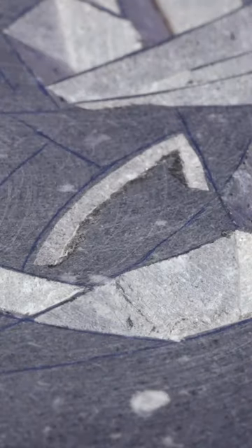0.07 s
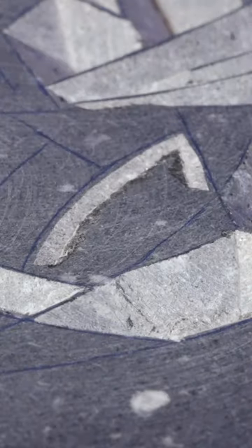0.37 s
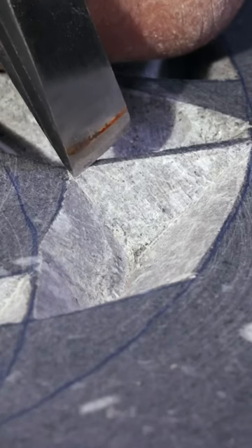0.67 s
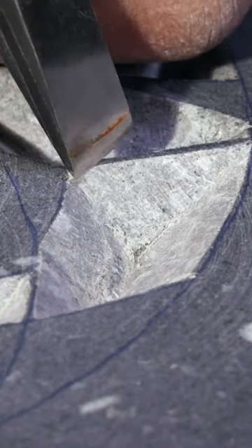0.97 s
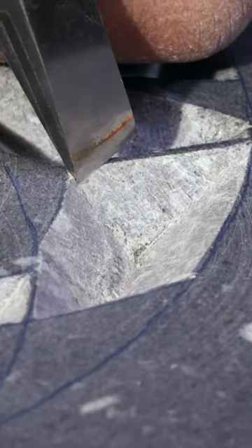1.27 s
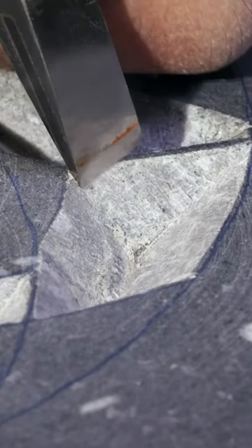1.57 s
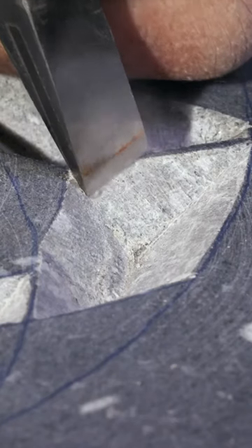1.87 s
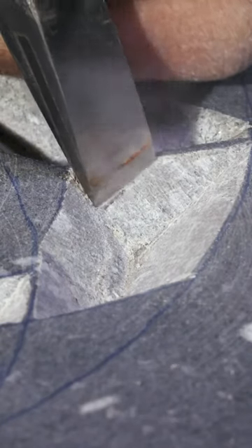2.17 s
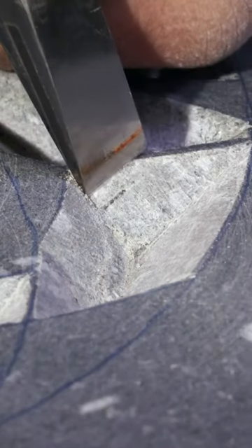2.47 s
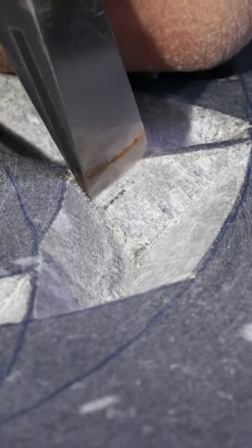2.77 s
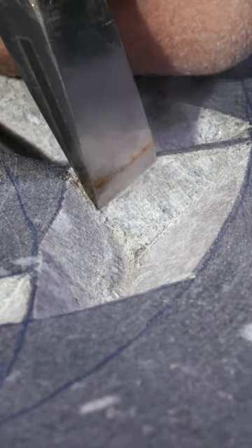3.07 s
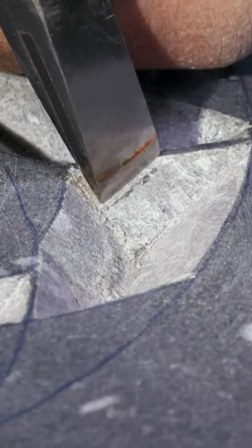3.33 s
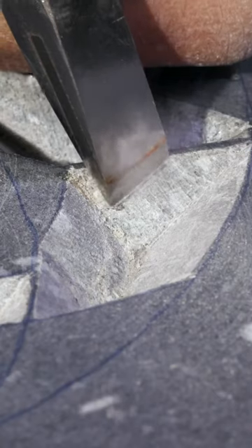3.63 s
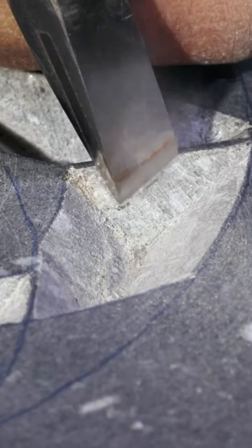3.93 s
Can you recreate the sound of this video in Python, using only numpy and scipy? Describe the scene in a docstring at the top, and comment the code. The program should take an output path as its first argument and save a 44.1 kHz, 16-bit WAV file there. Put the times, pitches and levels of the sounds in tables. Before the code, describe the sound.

An air-powered chisel carves stone close by, with little echo. After two faint thumps, air hisses and the tool stutters from 0.5 seconds, then hammers rapidly from 0.9, its steel ringing brightly over a low buzz from the block. At 2.3 seconds it pauses, the hiss drops and the edge ticks lightly twice. A second, uneven burst with hissing air runs from 2.7 seconds to the end at 4.

```python
"""An air-powered chisel carves stone close by, in a workshop with little echo. After two soft thumps, air
hisses out and the tool stutters, then hammers steadily from 0.9 s. Each piston stroke rings the steel, thumps
the stone and knocks back in the barrel; exhaust pulses make the barrel and hose buzz at the stroke rate, and
the ring shifts as the edge works deeper. At 2.3 s the tool pauses and the air dies down. Two light ticks
follow, then a second, uneven burst runs from 2.7 s to the end."""
import sys
import numpy as np
from scipy import signal
from scipy.fft import rfft, irfft, next_fast_len
from scipy.io import wavfile

SR = 44100
rng = np.random.default_rng(int(sys.argv[2]) if len(sys.argv) > 2 else 0)


def generate_wav(signal):
    """Clip the signal to [-1, 1] and save it as 16-bit WAV at the path in sys.argv[1]."""
    frames = np.transpose(np.atleast_2d(signal))
    scaled = np.clip(frames, -1, 1) * 32767
    pcm = np.round(scaled).astype(np.int16)
    wavfile.write(sys.argv[1], SR, pcm)


N = 176400
HIT_SIZE = 2048  # samples in one hit
TIME = np.arange(N) / SR
HIT_TIME, HIT_HZ = np.arange(HIT_SIZE) / SR, np.fft.rfftfreq(HIT_SIZE, 1 / SR)

# The tone of each sound. Each row: frequency in Hz, relative level in dB.
BACKGROUND_TONE = [(30, -41), (191, -5), (345, -18), (495, 1), (3070, -7), (14000, -21)]
HISS_TONE = [(500, -29), (1250, -19), (1800, -0.5), (2400, -1), (3300, 3.5), (5500, 2.5), (7400, 5),
             (8200, 2.5), (9500, 5), (11000, -1), (12000, 2.5), (14600, 4)]
RUSH_TONE = [(25, -19), (65, -21), (165, -1), (300, 7.5), (560, -1), (720, 4.5), (1100, -13), (3000, -47)]
THUMP_TONE = [(30, -30), (100, 5.5), (250, 5), (350, -4), (500, -34), (2000, -60)]
BUZZ_TONE = [(100, -34), (165, -2), (210, -12.5), (260, 4), (325, 2), (440, -11.5), (550, -12), (670, -6),
             (950, -13.5)]
THUD_TONE = [(30, -30.5), (110, -22.5), (170, -5.5), (280, -1), (430, 1), (560, -2), (720, 2.5),
             (1000, -24.5), (1600, -29), (5000, -44)]
KNOCK_TONE = [(200, -35), (1200, -18), (1800, -2), (2400, -5), (3100, 1), (4200, 3.5), (5400, -3),
              (7400, -0.5), (8200, -9.5), (10000, -12), (15000, -14)]
RATTLE_TONE = [(70, 16), (700, -52)]
CRACK_TONE = [(200, -25), (900, -7), (1300, -13), (1800, -6.5), (3500, -0.5), (7000, 1), (11000, -5),
              (15000, 2.5)]
# What happens on the way to the listener. Each row: frequency in Hz, gain in dB.
WALL_TONE = [(1000, -24.5), (3000, -14), (7000, -12.5), (12000, -18)]  # the nearest reflection
ECHO_TONE = [(150, -8), (600, -4.5), (3000, -8.5), (15000, -15.5)]  # the room's tail
STEREO_WIDTH = [(60, 2), (150, -6), (600, -10), (1200, -3.5), (3000, -9), (7000, -18), (14000, -13)]  # the part that differs between left and right
LEFT_OVER_RIGHT = [(750, .5), (1200, -5), (3000, -3), (8000, 0)]
MIC_TONE = [(14950, 0), (15450, -8), (15900, -24), (16500, -42)]
# How long the room rings. Each row: frequency in Hz, seconds to fade by 60 dB.
ECHO_FADE = [(150, 0.13), (600, 0.25), (3000, 0.25), (8000, 0.18), (15000, 0.11)]
# Air leaving the tool. Each row: time in seconds, hiss level in dB, low rush level in dB.
AIR_LEVELS = [(0, -36, -53.5), (.1, -53.5, -68), (.16, -74, -79), (.25, -85, -80), (.472, -86, -90),
              (.488, -40.5, -59), (.51, -48, -43), (.63, -38, -50), (.78, -39.5, -47), (.88, -31, -38),
              (.95, -36, -53), (1.3, -32.5, -49), (2.05, -31, -47), (2.2, -34, -55), (2.3, -39, -64),
              (2.35, -59, -57), (2.43, -58.5, -67), (2.57, -62.5, -71), (2.65, -54.5, -64),
              (2.69, -28, -39.5), (2.8, -31, -46.5), (3.15, -30.5, -45.5), (3.34, -36.5, -49),
              (3.44, -31.5, -42.5), (3.6, -32, -51), (3.81, -34, -57), (4, -31.5, -55)]
# Single hits. Each row: start in seconds, relative level in dB.
SOFT_THUMPS = [(0.235, -53.5), (0.291, -41)]  # handling the tool
EDGE_TICKS = [(2.476, -48), (2.616, -38.5)]  # setting the edge
DULL_BUMPS = [(.504, -28), (.677, -28), (.726, -25), (.794, -22.5), (.872, -23), (2.163, -30.5),
              (2.212, -32.5), (2.251, -30), (2.301, -29.5), (2.657, -43.5), (3.23, -29.5), (3.269, -27),
              (3.31, -24.5), (3.355, -23.5), (3.409, -26), (3.796, -30)]  # the tool bumps the stone
LONE_KNOCKS = [(.504, -10), (0.5077, -20), (0.5301, -19), (0.556, -19), (0.592, -22), (0.6515, -21),
               (0.714, -19), (0.847, -16), (0.8724, -9.5), (0.901, -15), (1.3245, -16), (1.9953, -16),
               (2.193, -20.5), (2.2343, -15.5), (2.2897, -16), (2.717, -16), (2.7418, -20), (2.8851, -19.5),
               (3.3373, -17.5), (3.377, -15), (3.4325, -15)]  # piston and shank (the chisel's shaft) knock
LONE_BLOWS = [(0.5149, -8.5), (0.5423, -15.5), (0.571, -16), (0.6169, -17.5), (0.676, -22.5), (.8725, -32)]  # the piston stutters
# The piston's pace. Each row: time in seconds, strokes per second.
FIRST_BURST = [(0.916, 34.33), (1.102, 33.82), (1.157, 31.71), (1.295, 32.05), (1.526, 35.54),
               (1.62, 41.28), (1.681, 30.82), (1.828, 42.31), (1.998, 40.81), (2.078, 50.12),
               (2.132, 35.24), (2.255, 20.93)]
SECOND_BURST = [(2.729, 41.78), (3.117, 41.76), (3.22, 26.66), (3.356, 21.3), (3.387, 31.71),
                (3.453, 48.03), (3.554, 36.67), (3.685, 44.36), (3.744, 32.9), (3.836, 31.33),
                (3.873, 37.5), (3.924, 45.12), (3.999, 43.49)]
# Strength through the bursts. Each row: time in seconds, relative level in dB.
TOOL_PRESS = [(.916, -45.5), (1.06, -50.5), (1.2, -44), (1.58, -44.5), (1.686, -50), (1.78, -42),
              (1.85, -47.5), (2.09, -43), (2.138, -59), (2.255, -52.5), (2.729, -45), (3.13, -45.5),
              (3.2, -65), (3.42, -49), (3.53, -52), (3.63, -46), (3.75, -52.5), (3.82, -46), (4, -47.5)]  # how hard the tool's body presses on the stone; sets the buzz and the thuds
EDGE_FORCE = [(.915, -9.5), (1.12, -11.5), (1.152, -18), (1.184, -8.5), (1.57, -8), (1.676, -13),
              (1.79, -8), (1.86, -12.5), (2.09, -12.5), (2.211, -16), (2.254, -25), (2.728, -4.5),
              (2.76, -9), (2.85, -11.5), (3.16, -12), (3.229, -14.5), (3.269, -13.5), (3.356, -16.5),
              (3.392, -16.5), (3.42, -5.5), (3.49, -12.5), (3.588, -15), (3.613, -24), (3.637, -11),
              (3.684, -11.5), (3.795, -15), (3.909, -8.5), (4, -15.5)]  # how hard the edge is driven in
# Notes of the block and its bench. Each row: pitch in Hz, relative level in dB, seconds to fade by 60 dB.
BLOCK_NOTES = [(162.5, -3.5, 0.42), (289.1, 3, 0.23), (446, 2.5, 0.59), (661, 2.5, 0.14)]
# Progress of the cut. Each row: time in seconds, depth from 0 (shallow) to 1 (deep).
CUT_DEPTH = [(.9, 0.03), (1.4, 0), (2, 0.82), (2.8, 0.75), (3.6, 1)]
# Notes of the steel. Each row: shallow and deep pitch in Hz, width in Hz, shallow and deep gain in dB.
STEEL_NOTES = [(5560, 5600, 140, -6, 1.5), (5600, 6570, 240, -23, -4), (7050, 6200, 220, -19, -7.5),
               (7100, 7000, 135, -14, 1.5), (8320, 7000, 360, -3, 6), (8800, 8690, 260, -33, 2.5),
               (10000, 9740, 490, 5, 0), (12570, 11400, 860, 4.5, 2.5), (12200, 12330, 1550, -5, 1.5),
               (14100, 6700, 130, -2, 1), (14900, 14500, 395, 11, 3.5)]


def amp(db):
    """Turn decibels into a gain."""
    return 10 ** (np.asarray(db) / 20)


def at_hz(table, hz):
    """Read a table between its frequencies, on a log scale."""
    freqs, values = np.transpose(table)
    return np.interp(np.log(hz + 1), np.log(freqs + 1), values)


def at_time(table, times):
    """Read each column of a table at the given times."""
    t, *columns = np.transpose(table)
    return [np.interp(times, t, column) for column in columns]


def filtered(x, response):
    """Scale each frequency of x by response(hz)."""
    size = next_fast_len(N + SR // 2)
    return irfft(rfft(x, size) * response(np.fft.rfftfreq(size, 1 / SR)), size)[..., :N]


def noise(tone):
    """Noise with the given tone and an average (rms) size of 1."""
    x = filtered(rng.standard_normal(N), lambda hz: amp(at_hz(tone, hz)))
    return x / x.std()


def hit_filter(tone):
    """Turn a tone into a filter that makes no sound before the hit (minimum phase)."""
    cepstrum = irfft(np.log(amp(at_hz(tone, HIT_HZ))))
    cepstrum[1:HIT_SIZE // 2] *= 2
    cepstrum[HIT_SIZE // 2 + 1:] = 0
    return np.exp(rfft(cepstrum))


def contacts(times, hold_s, decay_s, clean, rise_s=0.0007067, alike=0.45):
    """One spectrum per hit: a clean push plus a short crunch, partly like the one before."""
    grit = rng.standard_normal((len(times), HIT_SIZE))
    grit[1:] *= np.sqrt(1 - alike ** 2)
    grit = signal.lfilter([1], [1, -alike], grit, axis=0)
    rise = np.minimum(HIT_TIME / rise_s, 1) ** 2
    crunch = grit * rise * np.exp(-np.maximum(HIT_TIME - rise_s - hold_s, 0) / decay_s)
    push = clean * np.exp(-2j * np.pi * HIT_HZ * rise_s)
    return push + rfft(crunch / np.linalg.norm(crunch, axis=1, keepdims=True))


def play(times, level_db, spectra):
    """Lay hits out in time; a level is the hit's energy spread over a millisecond."""
    waves = irfft(spectra)
    gain = amp(level_db) * np.sqrt(SR / 1000) / np.linalg.norm(waves, axis=1)
    index = np.round(np.asarray(times) * SR).astype(int)[:, None] + np.arange(HIT_SIZE)
    return np.bincount(index.ravel(), (waves * gain[:, None]).ravel(), N)[:N]


def cycles(burst):
    """Time, stroke rate and strokes done so far through a burst."""
    t = np.arange(burst[0][0], burst[-1][0] + .002, 1 / SR)
    rate, = at_time(burst, t)
    return t, rate, np.cumsum(rate) / SR


def strokes(phase, lead_s=0.0006):
    """Times and stroke rates just before the piston passes a point (0 to 1) of its cycle."""
    rows = []
    for t, rate, done in map(cycles, (FIRST_BURST, SECOND_BURST)):
        i = np.searchsorted(done, np.arange(phase, done[-1]))
        rows.append([t[i] - lead_s, rate[i]])
    return np.hstack(rows)


def workshop(x, delay_s=0.0028):
    """The room answers with a near reflection and a short tail that dies fastest in the treble."""
    hz, t, spectra = signal.stft(rng.standard_normal(SR // 3), SR, nperseg=256)
    decay = amp(-60 * t / at_hz(ECHO_FADE, hz)[:, None])
    decay /= np.sqrt(np.sum(decay ** 2, axis=1, keepdims=True) * t[1] * SR)
    tail = signal.istft(spectra * decay * amp(at_hz(ECHO_TONE, hz))[:, None], SR, nperseg=256)[1]
    echo = signal.fftconvolve(x, tail)[:N]
    wall = filtered(x, lambda hz: amp(at_hz(WALL_TONE, hz)))
    return filtered(echo + wall, lambda hz: np.exp(-2j * np.pi * hz * delay_s))


def stereo_scatter(x, count=8, decay_s=0.0017):
    """Shifting reflections off the stone and the hand make left and right differ a little."""
    paths = rng.standard_normal((count, HIT_SIZE)) * np.exp(-HIT_TIME / decay_s)
    sway = [(15, 0), (60, -40), (300, -120)]  # Each row: frequency in Hz, level in dB.
    side = sum(noise(sway) * signal.fftconvolve(x, path)[:N] for path in paths) / np.linalg.norm(paths)
    side = filtered(side, lambda hz: amp(at_hz(STEREO_WIDTH, hz)))
    pair = np.array([x + side, x - side])
    return filtered(pair, lambda hz: amp(np.outer([.5, -.5], at_hz(LEFT_OVER_RIGHT, hz))))


def exhaust(open_db=-31, pivot_hz=3870):
    """Air hisses out, duller as the valve closes, over a low rush."""
    hiss_db, rush_db = at_time(AIR_LEVELS, TIME)
    hz, t, spectra = signal.stft(noise(HISS_TONE), SR, nperseg=256)
    db_per_octave = np.clip(0.63 * (at_time(AIR_LEVELS, t)[0] - open_db), -3, 0)
    octaves = np.log2(np.maximum(hz, 500) / pivot_hz)[:, None]
    hiss = signal.istft(spectra * amp(octaves * db_per_octave), SR, nperseg=256)[1][:N]
    return hiss * amp(hiss_db) + noise(RUSH_TONE) * amp(rush_db)


def handling():
    """Steely ticks of the edge and soft thumps while the tool rests."""
    times, db = np.transpose(EDGE_TICKS)
    tick = hit_filter(KNOCK_TONE) * steel(times)
    ticks = play(times, db, tick * contacts(times, hold_s=0.00069, decay_s=0.0018, clean=0.42))
    times, db = np.transpose(SOFT_THUMPS)
    thump = hit_filter(THUMP_TONE) * contacts(times, hold_s=0.0012, decay_s=0.0044, clean=3.2)
    return ticks + play(times, db, thump)


def barrel_buzz(gain_db=-1.2, fade_s=0.005):
    """Exhaust pulses make the tool's barrel and hose hum at multiples of the stroke rate."""
    buzz = np.zeros(N)
    for t, rate, done in map(cycles, (FIRST_BURST, SECOND_BURST)):
        hum = sum(amp(at_hz(BUZZ_TONE, k * rate)) * np.sin(2 * np.pi * (k * done + rng.random()))
                  for k in range(1, 30))
        fade = np.minimum(np.minimum(t - t[0], t[-1] - t) / fade_s, 1)
        buzz += np.interp(TIME, t, fade * hum / hum.std(), 0, 0)
    return buzz * amp(at_time(TOOL_PRESS, TIME)[0] + gain_db)


def block_ring(thuds, gain_db=-6):
    """Thuds set the block and its bench ringing on a few low notes."""
    t = TIME[:SR // 2]
    notes = sum(amp(db - 60 * t / fade_s) * np.sin(2 * np.pi * hz * t) for hz, db, fade_s in BLOCK_NOTES)
    ring = signal.fftconvolve(thuds, notes)[:N]
    return amp(gain_db) * ring * thuds.std() / ring.std()


def stone_thuds(gain_db=14, usual_rate=40.7):
    """The block thuds under every stroke and bump; slow strokes thump harder."""
    times, rate = strokes(phase=0)
    db = at_time(TOOL_PRESS, times)[0] + gain_db - 0.425 * (rate - usual_rate)
    times, db = np.hstack([[times, db], np.transpose(DULL_BUMPS)])
    thud = hit_filter(THUD_TONE) * contacts(times, hold_s=0.00025, decay_s=0.0019, clean=1.57)
    thuds = play(times, db, thud)
    return thuds + block_ring(thuds)


def shank_ping(start_s=0.7145, level_db=-38, hz=3300, fade_s=0.22):
    """The loose shank rings once in the stutter; its rattling makes the note rough."""
    age = np.maximum(TIME - start_s, 0)
    return amp(level_db - 60 * age / fade_s) * np.sin(2 * np.pi * hz * age) * noise(RATTLE_TONE)


def piston_knocks(gain_db=-2):
    """The piston knocks unevenly as it flies back, joined by lone knocks and the shank's ping."""
    times, _ = strokes(phase=0.58)
    db = rng.normal(-22.5, 1.5, len(times))
    times, db = np.hstack([[times, db], np.transpose(LONE_KNOCKS)])
    ping = shank_ping()
    knock = hit_filter(KNOCK_TONE) * contacts(times, hold_s=0.00026, decay_s=0.0019, clean=0.59)
    return play(times, db + gain_db, knock) + ping


def steel(times, spread_db=1.45):
    """How the steel rings at each hit: its notes shift with depth and vary in strength."""
    depth = at_time(CUT_DEPTH, times)[0][:, None]
    response = 0
    for k, (shallow_hz, deep_hz, width, shallow_db, deep_db) in enumerate(STEEL_NOTES):
        hz = shallow_hz + (deep_hz - shallow_hz) * depth
        gain = amp(shallow_db + (deep_db - shallow_db) * depth + rng.normal(0, spread_db, depth.shape))
        damping = 1j * HIT_HZ * width
        response += (-1) ** k * gain * damping / (hz ** 2 - HIT_HZ ** 2 + damping)
    return response


def chisel_blows(ring_db=-2.5, crack_db=-5):
    """Each forward blow rings the steel and cracks the stone."""
    times, _ = strokes(phase=0)
    db, = at_time(EDGE_FORCE, times)
    times, db = np.hstack([[times, db], np.transpose(LONE_BLOWS)])
    ring = steel(times) * contacts(times, hold_s=0.0009, decay_s=0.001, clean=0.8)
    crack = hit_filter(CRACK_TONE) * contacts(times, hold_s=0.00034, decay_s=0.0014, clean=0.11)
    return play(times, db + ring_db, ring) + play(times, db + crack_db, crack)


def scene():
    """Mix the tool, its air and the room over a faint background noise."""
    hits = chisel_blows() + piston_knocks() + stone_thuds()
    mix = hits + workshop(hits) + barrel_buzz() + handling() + exhaust()
    return stereo_scatter(mix + amp(-83) * noise(BACKGROUND_TONE))


def record(dry, top_hz=16500):
    """The microphone softens the highest treble and keeps nothing above top_hz."""
    return filtered(dry, lambda hz: amp(at_hz(MIC_TONE, hz)) * (hz < top_hz))


dry = scene()
out = record(dry)
generate_wav(out)
```